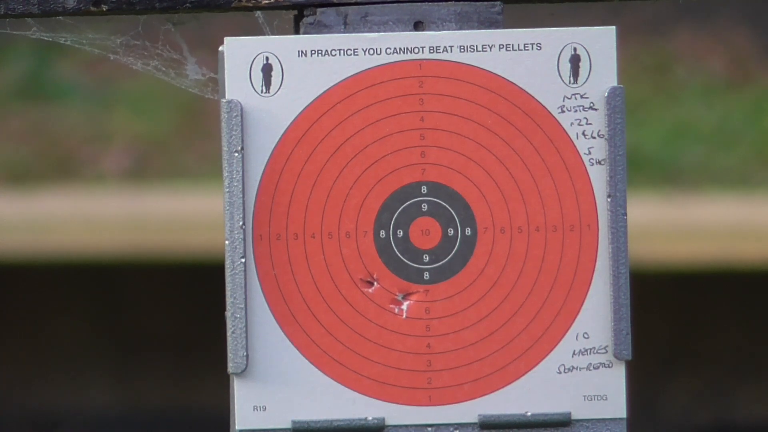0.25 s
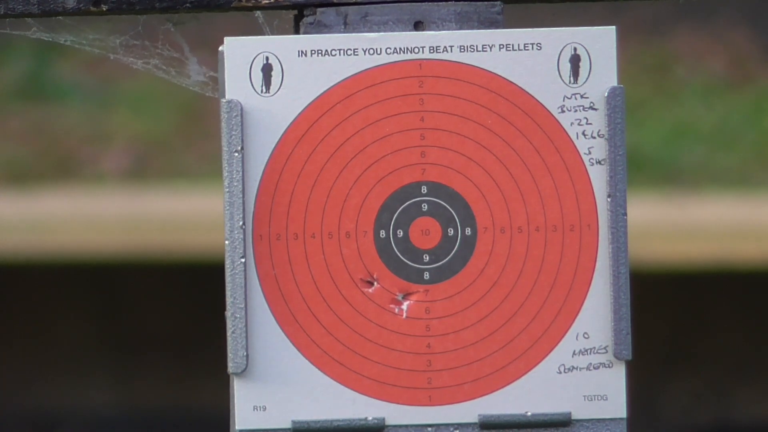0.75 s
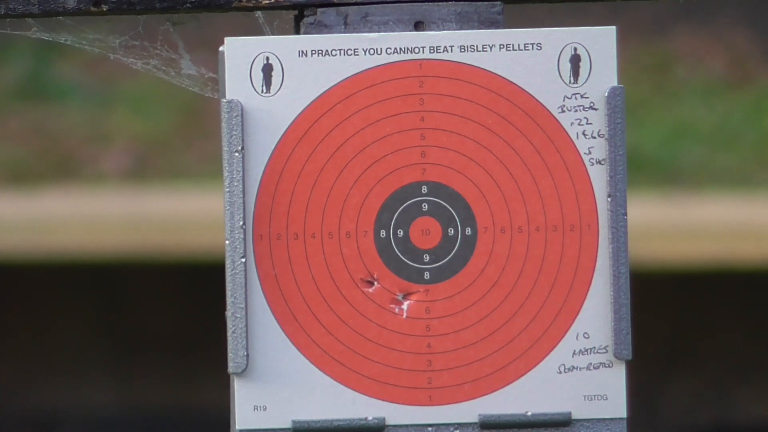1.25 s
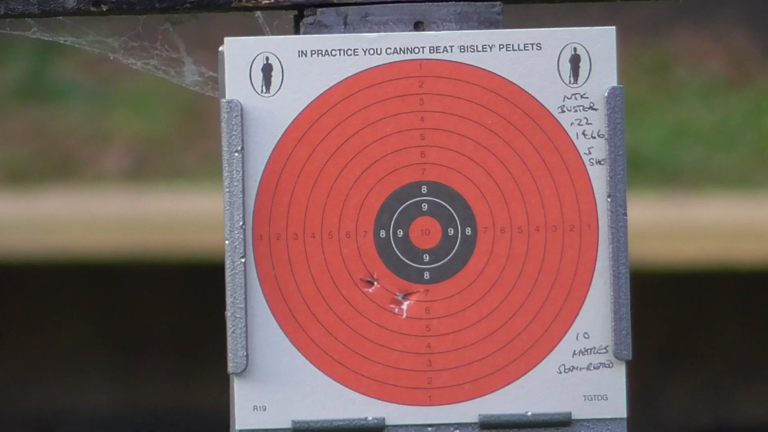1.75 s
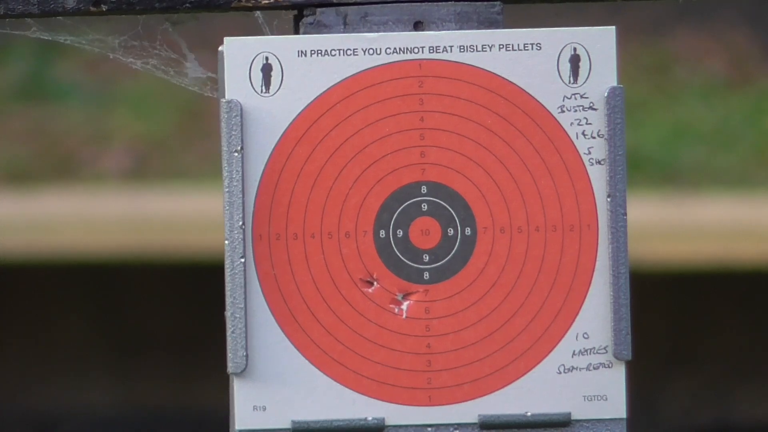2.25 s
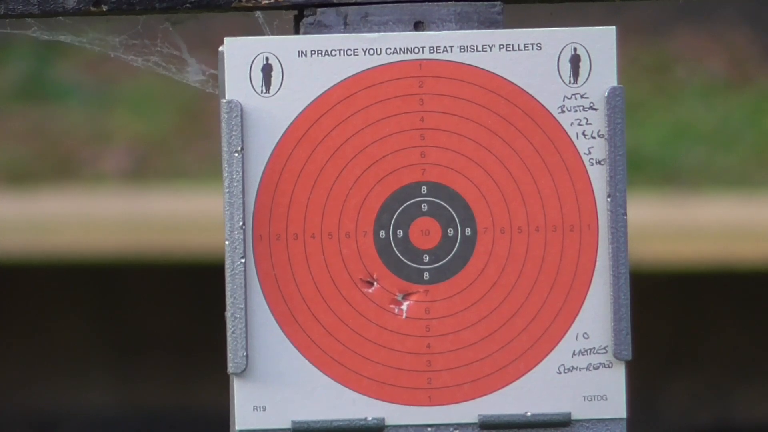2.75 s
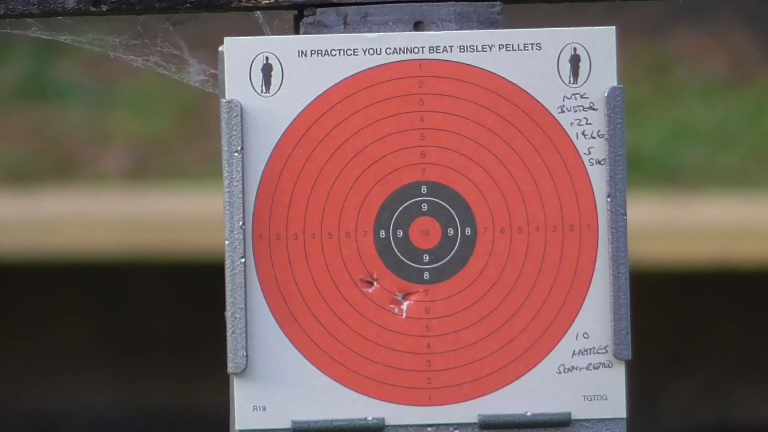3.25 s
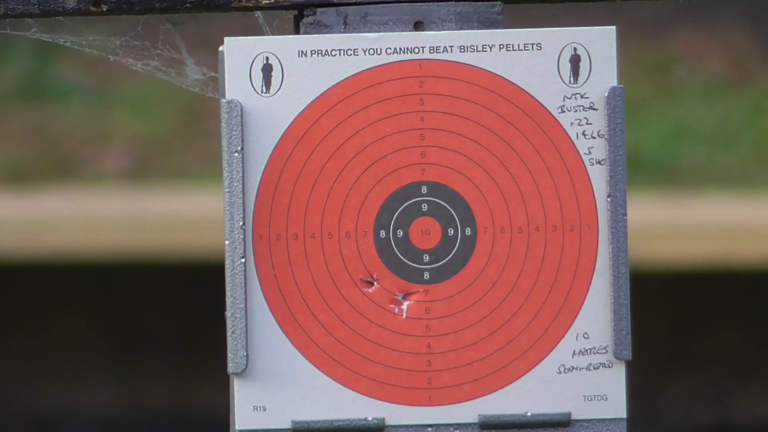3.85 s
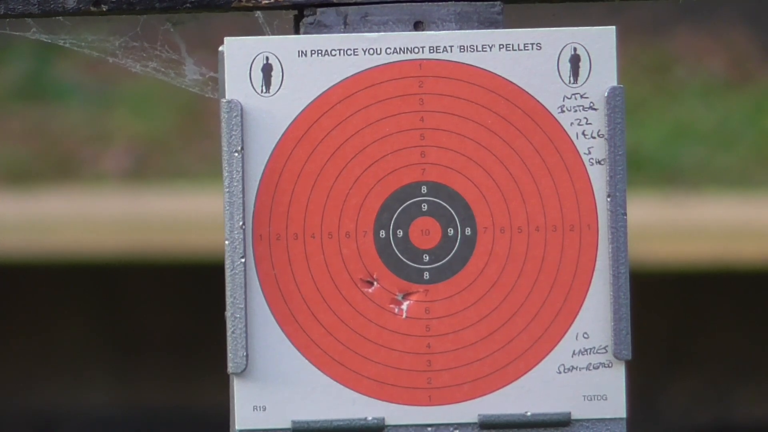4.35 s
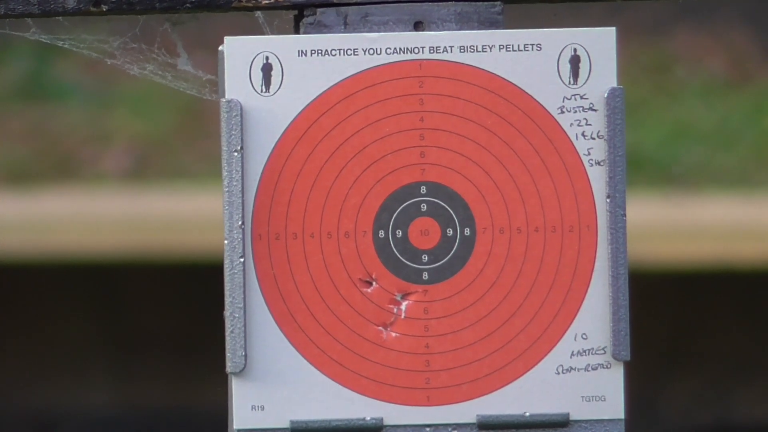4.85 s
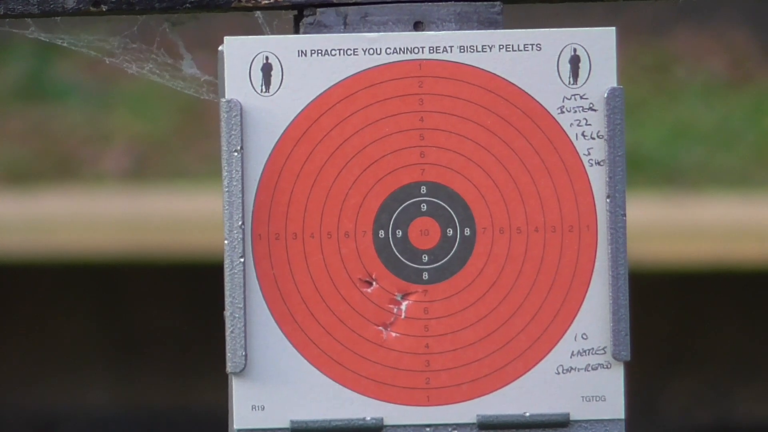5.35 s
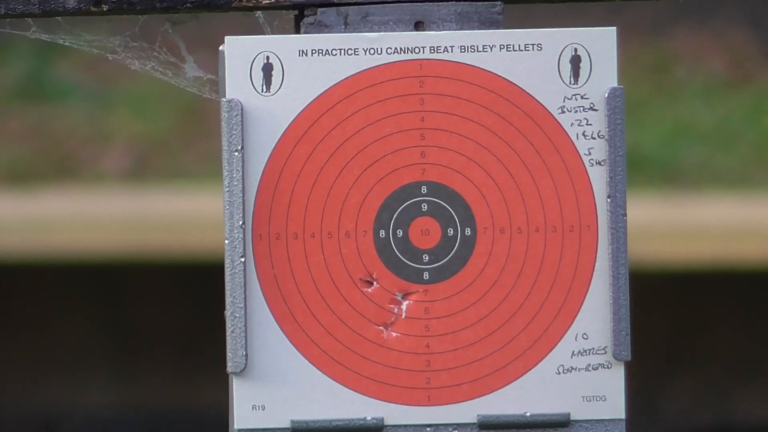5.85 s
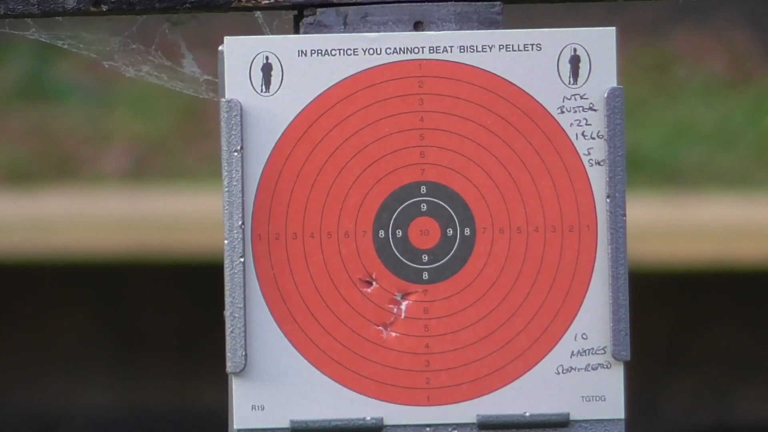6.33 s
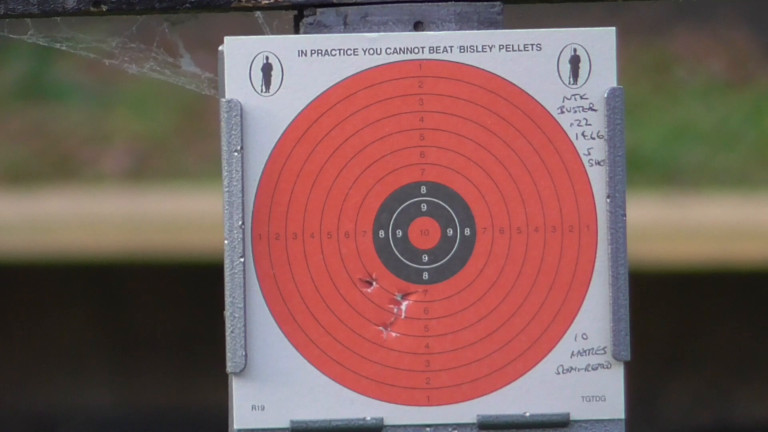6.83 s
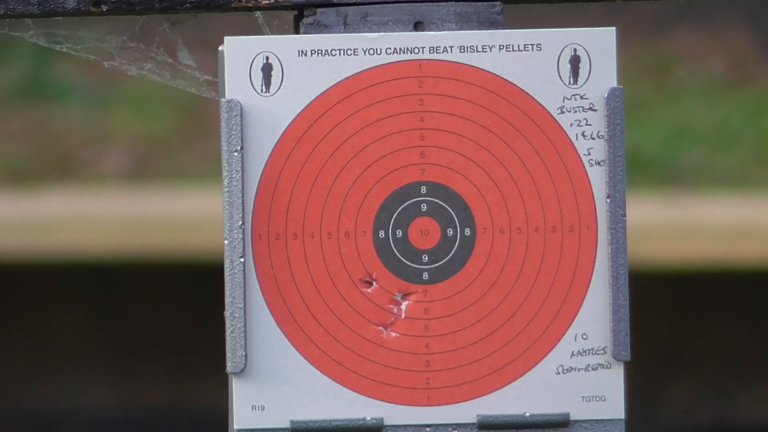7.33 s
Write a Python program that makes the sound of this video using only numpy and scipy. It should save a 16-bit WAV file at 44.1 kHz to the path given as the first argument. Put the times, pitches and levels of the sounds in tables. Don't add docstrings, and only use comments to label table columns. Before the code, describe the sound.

In a garden, sparrows chirp in quick bursts over soft distant traffic, with thin high whistles. After about four and a half seconds an air pistol cracks close by, followed almost at once by the pellet hitting a steel trap, rattling and echoing off fences. Background dips, then birds return. The barrel breaks open with clicks, latches shut sharply, and something is set down. Small microphone, thin bass, clipped peaks.

```python
import sys
import numpy as np
from scipy import signal
from scipy.fft import rfft, irfft
from scipy.io import wavfile
from scipy.ndimage import uniform_filter1d

SR = 44100
rng = np.random.default_rng(int(sys.argv[2]) if len(sys.argv) > 2 else 0)


def invert_db(x):
    u = np.asarray(x, float) / 20
    return 10 ** u


def dump(signal):
    limited = np.clip(np.atleast_2d(signal).T, -1, 1)
    pcm = np.round(limited * 32767).astype(np.int16)
    wavfile.write(sys.argv[1], SR, pcm)


N = 334712
TIME = np.arange(N) / SR


def band(x, hz, width):
    return signal.lfilter(*signal.iirpeak(min(hz, 0.45 * SR), hz / width, fs=SR), x)


def shape(points, hz):
    f, db = np.transpose(points)
    return invert_db(np.interp(np.log(hz + 1), np.log(f), db))


def bumps(peaks, hz):
    return invert_db(sum(db / (1 + (2 * (hz - f) / width) ** 2) for f, width, db in peaks))


def walk(rate, count=N):
    k = int(SR / rate)
    held = np.repeat(rng.standard_normal(count // k + 1), k)
    return uniform_filter1d(uniform_filter1d(held, k), k)[:count]


def add(out, s, x):
    i = int(s * SR)
    out[i:i + len(x)] += x[:N - i]


# frequency_hz, level_db per Hz
ROAD_SPECTRUM = [(25, 4.5), (130, -6.5), (300, -12), (950, -1.5), (1520, -9.5), (1700, -19), (4200, -18),
                 (16000, -33)]
# frequency_hz, width_hz, level_db
HOUSING = [(2190, 170, 6), (2900, 780, -4), (6100, 3200, -15), (7000, 4800, 6.5), (8710, 400, -0.5),
           (289, 67, 7.5)]


def traffic():
    hz, swell, out = np.fft.rfftfreq(N, 1 / SR), walk(1.5), 0
    noise = rfft(rng.standard_normal(N)) * shape(ROAD_SPECTRUM, hz) * bumps(HOUSING, hz)
    octave = np.log2(hz + 1)
    for centre in range(4, 16):
        part = irfft(noise * np.clip(1 - abs(octave - centre), 0, 1), N)
        unsteady = 1 if centre < 12 else 0.4
        out = out + part * invert_db((0.9 * swell + 1.3 * walk(6)) * unsteady)
    return invert_db(-53) * out / out.std()


def glides(table, flutter, peak, ends_db):
    out = np.zeros(N)
    for s, length, first, last, db in table:
        t = TIME[:int(length * SR)]
        edge = np.minimum(np.minimum(t, length - t) / 0.0021, 1)
        glide = last + (first - last) * (1 - t / length) ** 2.7
        pitch = glide * (1 + flutter * walk(170, len(t)))
        swell_db = np.interp(t / length, [0, peak, 1], [ends_db, 0, ends_db])
        strength = np.sqrt(2) * edge * invert_db(db + swell_db + 2.4 * walk(40, len(t)))
        add(out, s, strength * np.sin(2 * np.pi * np.cumsum(pitch) / SR))
    return out


# start_s, length_s, start_hz, end_hz, level_db
ALARMS = [
    (0, 0.029, 8300, 8350, -67),
    (1.33, 0.33, 7970, 8380, -58.5),
    (2.28, 0.26, 7800, 8160, -68.5),
    (4.96, 0.18, 8400, 8340, -63),
    (6.99, 0.32, 8346, 8300, -63.5),
]


def alarm_whistles():
    return glides(ALARMS, flutter=0.0029, peak=0.29, ends_db=-11.5)


def sing(pitch, db):
    count = len(pitch)
    shaky = pitch * (1 + 0.012 * walk(300, count))
    rasp = 1 + 0.7 * walk(1200, count)
    strength = np.hanning(count) ** 0.35 * invert_db(db + 3 * walk(200, count))
    return strength * rasp * np.sin(2 * np.pi * np.cumsum(shaky) / SR)


# start_s, length_s, top_hz, level_db
ARCHED = [(0.325, 0.037, 3950, -53), (0.638, 0.026, 4900, -56.5), (0.723, 0.045, 4300, -56),
          (1.076, 0.044, 4350, -57), (1.938, 0.049, 3750, -63), (2.767, 0.044, 4180, -57.5),
          (3.26, 0.043, 4530, -55), (3.611, 0.03, 5120, -59.5), (3.673, 0.031, 4610, -59.5),
          (6.367, 0.026, 4950, -63)]
# start_s, length_s, start_hz, end_hz, level_db
FALLING = [(.103, 0.063, 5650, 3240, -56), (.304, 0.041, 4700, 3400, -65), (.665, 0.045, 3900, 3000, -64.5),
           (1.215, 0.043, 5500, 4070, -65), (1.27, 0.05, 3800, 3030, -73), (1.543, .014, 4900, 3870, -57),
           (1.59, 0.02, 4270, 3600, -55), (1.908, .022, 4000, 3070, -58), (0, .035, 3340, 2800, -61),
           (2.35, 0.023, 4570, 3930, -70), (3.022, 0.037, 4900, 4750, -64), (3.048, 0.078, 4600, 3950, -68),
           (3.198, 0.03, 4260, 3210, -55), (3.643, 0.013, 4400, 4020, -50), (3.69, 0.022, 4070, 3360, -57),
           (2.815, 0.041, 3430, 2570, -61), (4.515, 0.044, 4300, 4160, -51),
           (4.548, 0.015, 4200, 3280, -57), (4.322, 0.031, 3760, 3480, -65.5),
           (5.905, 0.019, 4710, 4470, -57), (5.966, 0.034, 3700, 3380, -61.5),
           (6.11, 0.018, 5100, 4500, -64), (6.128, .028, 4400, 4290, -62), (6.148, .022, 3950, 3810, -61),
           (6.288, 0.023, 3840, 3780, -62), (6.312, 0.03, 3900, 3655, -54), (6.33, 0.027, 3550, 2970, -57)]
# start_s, length_s, start_hz, end_hz, level_db
RISING = [(.205, 0.085, 3600, 4440, -68), (.255, 0.046, 3900, 4255, -52), (1.882, 0.021, 4210, 4140, -53.5),
          (1.495, 0.047, 4200, 5500, -65), (1.56, 0.02, 3590, 4500, -53.5), (3.175, 0.022, 4300, 4610, -55),
          (4.066, 0.042, 5070, 5900, -67.5), (2.31, 0.017, 4230, 4540, -61),
          (2.33, 0.034, 4960, 5700, -63.5), (2.408, 0.014, 4200, 4600, -51),
          (4.103, .015, 3700, 4770, -53.5), (4.128, 0.036, 3480, 5190, -56),
          (4.145, 0.018, 5370, 6100, -62.5), (4.197, 0.026, 3220, 4620, -58),
          (4.48, 0.046, 4000, 4190, -60), (4.593, 0.034, 3250, 4580, -51), (5.872, 0.027, 3500, 5120, -59),
          (5.93, 0.018, 3280, 3470, -57), (5.945, .024, 3450, 4580, -55.5), (6.555, .053, 4150, 4450, -64),
          (6.61, 0.022, 3640, 3780, -55.5)]
# start_s, length_s, start_hz, end_hz, level_db
DISTANT = [(.95, .05, 4300, 3300, -69), (1.925, .028, 4900, 6600, -68), (2.165, .035, 3840, 4600, -67),
           (2.292, .025, 4200, 6200, -67), (2.385, .022, 3200, 4150, -66), (2.43, .045, 5200, 5800, -67),
           (2.47, .04, 4520, 4480, -65), (2.576, .03, 4550, 4350, -66), (3.0, .03, 6200, 4900, -67),
           (3.128, .022, 4000, 4950, -67), (3.495, .04, 3400, 4440, -68), (3.19, .025, 4900, 4880, -64),
           (3.35, .06, 3000, 2400, -70), (4.565, .03, 4600, 6100, -66), (4.39, .015, 3300, 3200, -66),
           (4.46, .015, 3600, 3500, -67), (5.365, .02, 3550, 3800, -62), (5.895, .04, 5550, 5350, -66),
           (5.845, .02, 4500, 4450, -67), (6.41, .015, 4200, 3900, -66), (6.44, .025, 3800, 4300, -67)]
# start_s, length_s, start_hz, end_hz, swing_hz, level_db
WARBLING = [
    (1.1, .1, 3886, 3215, 244, -54.5),
    (7.34, 0.16, 4380, 3475, 304, -54.5),
]


def sparrows():
    out = np.zeros(N)
    strokes = [(s, length, 0.8 * top, top, 0.74 * top, db) for s, length, top, db in ARCHED]
    for table, halfway in [(FALLING, 0.67), (RISING, 0.84), (DISTANT, 0.6)]:
        for s, length, first, last, db in table:
            strokes.append((s, length, first, first + halfway * (last - first), last, db))
    for s, length, first, turn, last, db in strokes:
        u = np.arange(0, 1, 1 / (length * SR))
        add(out, s, sing(np.interp(u, [0, 0.5, 1], [first, turn, last]), db))
    warble_hz = 28
    for s, length, first, last, swing, db in WARBLING:
        t = TIME[:int(length * SR)]
        sinking = first + (last - first) * t / length
        add(out, s, sing(sinking + swing * np.cos(2 * np.pi * warble_hz * t), db))
    return 0.7 * out + 0.8 * band(out, 3400, 3000)


# start_s, length_s, start_hz, end_hz,
# level_db
THRUSH = [(2.615, .045, 2630, 2700, -63), (2.905, .095, 2750, 3760, -67), (3.885, .065, 2560, 2900, -65),
          (4.04, .07, 2720, 2910, -64.5), (4.1, .06, 2920, 2770, -64.5), (4.18, .045, 2730, 2930, -63),
          (4.21, .065, 2600, 2350, -66), (4.41, .06, 2610, 2900, -62), (5.24, .04, 2600, 2800, -63),
          (.89, .06, 1520, 1610, -57), (4.245, .045, 1560, 1610, -59), (1.755, .04, 4400, 4960, -68),
          (4.396, .025, 4270, 5170, -66)]


def thrush():
    return glides(THRUSH, flutter=0.0072, peak=0.24, ends_db=-14.5)


def birds():
    song = sparrows() + thrush()
    out = invert_db(-1.5) * song
    t, size = TIME[:SR // 3], SR // 16
    fade = (np.exp(-t / 0.016) + 0.42 * np.exp(-t / 0.1)) / np.sqrt(0.014 * SR)
    for i in range(0, N, size):
        piece = song[i:i + 2 * size]
        piece = piece * np.hanning(2 * size)[:len(piece)]
        scatter = fade * rng.standard_normal(len(t))
        add(out, i / SR, invert_db(-2) * signal.fftconvolve(piece, scatter))
    return out


# start_s, length_s, start_hz, end_hz, level_db
ENGINE = [
    (.95, 1, 123, 126, -64),
    (4.33, 0.72, 117.8, 119.6, -54),
    (4.8, 0.47, 120.8, 128, -62),
]


def far_engine():
    return glides(ENGINE, flutter=0.019, peak=0.21, ends_db=-10.5)


def contact(count, db, hz, width, t60, noisy):
    t, noisy = TIME[:count], np.clip(noisy, 0, 1)
    rattle = band(band(rng.standard_normal(count), hz, 1.1 * width), hz, 1.1 * width)
    body = (1 - noisy) * np.sin(2 * np.pi * hz * t) + noisy * 1.645 * rattle / rattle.std()
    return invert_db(db - 60 * t / t60) * np.minimum(t / 0.00015, 1) * body


def blows(table, part):
    out = np.zeros(N)
    for s, db, hard_db, longer in table:
        for hz, width, t60, noisy, mode_db in part:
            tilt_db = hard_db * max(np.log2(hz / part[0][0]), 0)
            add(out, s, contact(SR // 8, db + mode_db + tilt_db, hz, width, t60 * longer, noisy))
    return out


# start_s, peak_db, centre_hz, t60_s
DRY_TICKS = [(4.761, -36, 2970, 0.24), (4.762, -31, 3900, 0.012), (4.813, -22, 4470, .014),
             (4.799, -19.5, 3000, 0.009), (4.6482, -33, 10200, .012), (4.863, -31.5, 5740, 0.028),
             (4.6286, -25, 6960, .008), (4.683, -38, 10300, .012), (4.6895, -38, 11000, 0.011),
             (6.297, -50, 3960, 0.036), (6.307, -38, 3910, 0.043), (5.835, -51.5, 6970, .02),
             (6.646, -43, 7800, 0.051), (6.649, -29, 3620, 0.025), (6.691, -46, 5000, .017),
             (6.716, -19.5, 6500, 0.017), (6.7173, -29, 12000, 0.044), (6.8475, -42, 5970, 0.018),
             (6.857, -37, 6900, .02), (6.9103, -44, 8350, 0.012), (6.92, -35, 6300, .01),
             (6.9415, -34, 7000, .011), (6.949, -41, 9000, .012), (7.101, -56, 7350, .016),
             (7.115, -50, 7500, .015), (7.581, -54, 2500, 0.018)]


def ticks():
    out = np.zeros(N)
    for s, db, hz, t60 in DRY_TICKS:
        add(out, s, contact(SR // 10, db, hz, 3900, t60, 0.56))
    return out


# start_s, peak_db, hardness_db per octave, length_factor
GAS_PUFFS = [
    (4.6294, -1, 0, 0.56),
    (4.6304, 0, -4.5, 1.17),
    (4.6343, -2.5, 1.5, 0.93),
    (4.6392, -26.5, 2, 1.9),
    (4.6424, -13.5, 1, 0.7),
    (4.6484, -36, 5.5, 1.2),
]
# ring_hz, width_hz, t60_s, noisy_share, level_db
MUZZLE_AIR = [(4300, 2400, 0.0042, 1, -0.5), (11700, 2600, 0.0049, 0.55, 0)]


def muzzle_blast():
    return blows(GAS_PUFFS, MUZZLE_AIR)


# start_s, peak_db, hardness_db per octave, length_factor
KICKS = [
    (4.6302, 1.5, 0.5, 0.81),
    (4.6389, -16, -2, 0.88),
]
# ring_hz, width_hz, t60_s, noisy_share, level_db
STOCK_MODES = [(808, 210, 0.018, 0.086, 1), (1460, 1700, 0.018, 0.95, -9), (255, 160, 0.062, 0.39, -27.5),
               (614, 130, .02, 0.23, -24), (6760, 11000, .036, 1, -19)]


def recoil():
    return blows(KICKS, STOCK_MODES)


def returns(table, colour):
    out, hz, t = np.zeros(N), np.fft.rfftfreq(SR // 2, 1 / SR), TIME[:SR // 2]
    treble = 1 / (1 + (3600 / (hz + 1)) ** 4)
    air_db_per_s = 29
    for s, db, rise, t60, treble_db in table:
        noise = rfft(rng.standard_normal(len(t)) * invert_db(2.2 * walk(170, len(t)))) * colour(hz)
        low, high = irfft(noise * (1 - treble)), irfft(noise * treble)
        late = np.maximum(t - rise, 0)
        mix = low / low.std() + invert_db(treble_db - air_db_per_s * late) * high / high.std()
        add(out, s, np.minimum(t / rise, 1) ** 2.1 * invert_db(db - 60 * late / t60) * mix)
    return out


# start_s, peak_db, rise_s, t60_s, treble_db
BLAST_REFLECTIONS = [
    (4.638, -33.5, 0.0056, 0.1, -2.5),
    (4.64, -30.5, 0.031, 0.24, -5.5),
    (4.7, -39.5, 0.062, 0.27, -2.5),
]
# frequency_hz, level_db per Hz
BLAST_COLOUR = [(120, -43.5), (303, -8), (451, -17), (1130, -2.5), (1780, -19.5), (3870, -12), (10500, -16),
                (15000, -31)]


def blast_echo():
    return returns(BLAST_REFLECTIONS, lambda hz: shape(BLAST_COLOUR, hz))


# start_s, dip_db, recovery_s
GAIN_DIPS = [
    (4.645, 15.5, 0.15),
    (4.80, 39, 0.069),
    (6.725, -0.5, .05),
    (6.94, 4, 0.084),
]


def gain_control(background):
    dip_db = sum(db * (TIME > s) * np.exp(-np.maximum(TIME - s, 0) / back) for s, db, back in GAIN_DIPS)
    return background * invert_db(-uniform_filter1d(dip_db, size=300))


# start_s, peak_db, hardness_db per octave, length_factor
PELLET = [
    (4.7888, -5.5, 0.0066, 1),
    (4.8015, -22.5, 0.85, 1),
]
# ring_hz, width_hz, t60_s, noisy_share, level_db
STEEL_MODES = [(1577, 240, 0.036, 0.21, -1.5), (1214, 240, 0.1, 0.28, -12.5),
               (1488, 700, 0.033, 0.11, -3.5), (3440, 210, 0.055, 0.41, -9.5),
               (3620, 370, 0.049, 0.4, -16.5), (5270, 170, .03, .4, -26), (6250, 690, .03, 0.77, -11),
               (7100, 200, .04, .2, -11.5), (11110, 220, 0.018, 0.083, -2), (12400, 400, .02, .3, -32),
               (4500, 3300, 0.011, .8, -3), (4960, 6200, 0.17, 1, -25), (2083, 160, 0.062, 0.22, -13.5)]
# start_s, peak_db, hardness_db per octave, length_factor
LEAD_BOUNCES = [(4.8642, -31, 2.5, 0.49), (4.879, -38, 0, 1), (4.892, -30, -12, 1.1), (4.905, -31, -1, 1.3),
                (4.924, -29, -4, .9), (4.942, -38, -2, .9), (4.962, -32, -4, 0.99), (4.98, -37, -1.5, .9),
                (5.017, -40, -1, 0.91), (5.0817, -35, -8, 0.6), (5.1555, -39, -9, 0.67),
                (5.195, -47.5, -2.5, 0.47), (5.2184, -51, -4, 0.65)]
# ring_hz, width_hz, t60_s, noisy_share, level_db
PLATE_MODES = [(1214, 130, 0.093, 0.63, -0.5), (1590, 230, 0.048, 0.7, -12), (2010, 84, 0.076, 0.77, -6.5),
               (3720, 810, 0.072, 0.56, -10), (5100, 280, .08, 0.57, -6.5), (6340, 620, 0.045, 0.54, -9)]


def steel_trap():
    struck = blows(PELLET, STEEL_MODES) + blows(LEAD_BOUNCES, PLATE_MODES)
    return signal.sosfilt(signal.butter(3, 840, "high", fs=SR, output="sos"), struck)


# start_s, peak_db, rise_s, t60_s, treble_db
TRAP_REFLECTIONS = [
    (4.795, -21, 0.0038, 0.17, -12.5),
    (4.81, -27.5, 0.066, 0.44, -6.5),
    (4.9, -38.5, 0.059, 0.34, -13),
    (5.012, -51, 0.0051, 0.076, -8),
    (5.04, -48, 0.013, 1, -15),
    (5.078, -54, 0.0083, 0.068, -21),
]
# frequency_hz, level_db per Hz
TRAP_COLOUR = [(240, -101), (400, -36.5), (1100, -1), (2060, -9.5), (5200, -10.5), (8000, -18),
               (11400, -28), (15000, -59)]
# frequency_hz, width_hz, level_db
TRAP_PEAKS = [(1226, 77, 13), (1600, 220, 11), (2030, 180, 13), (2660, 100, 6.5), (3515, 300, 14),
              (4400, 300, 8), (5190, 230, 11.5), (6100, 160, -0.5), (11300, 340, 17)]


def trap_echo():
    return returns(TRAP_REFLECTIONS, lambda hz: shape(TRAP_COLOUR, hz) * bumps(TRAP_PEAKS, hz))


# start_s, peak_db, rise_s, t60_s, treble_db
RELOAD_REFLECTIONS = [(6.47, -48, 0.058, 0.48, -7), (6.65, -35, 0.0023, 0.062, -0.5),
                      (6.66, -52.5, 0.018, 0.81, -2), (6.72, -52, 0.0056, 0.42, 9.5),
                      (6.8, -51, 0.082, 0.42, -6.5), (6.932, -34, 0.0025, 0.079, -1.5),
                      (6.95, -47, 0.013, 0.74, 0.5), (6.975, -58, 0.059, .07, -4),
                      (7.04, -53, 0.05, 0.66, -4.5), (7.2, -67.5, 0.13, 0.042, 8.5)]
# frequency_hz, level_db per Hz
RELOAD_COLOUR = [(180, -35.5), (350, -1.5), (1100, 7), (1600, -8), (3600, -12.5), (6000, -22.5),
                 (15000, -39)]
# frequency_hz, width_hz, level_db
LOOSE_PARTS = [(2300, 520, 12), (3600, 400, 3), (7400, 1200, 7), (11600, 1200, 7)]


def reload_echo():
    return returns(RELOAD_REFLECTIONS, lambda hz: shape(RELOAD_COLOUR, hz) * bumps(LOOSE_PARTS, hz))


# start_s, peak_db, hardness_db per octave, length_factor
HINGE_SLIPS = [
    (6.5015, -42, -5.5, 0.93),
    (6.516, -42, -14, 0.75),
    (6.5205, -42, -5, .5),
    (6.527, -39, -3, 0.48),
    (6.5302, -33, -15, .7),
    (6.534, -35, -0.5, .7),
]
# start_s, peak_db, hardness_db per octave, length_factor
BARREL_BREAKS = [
    (6.5366, -28.5, -0.5, 1.3),
    (6.6425, -29.5, 4.5, 1.03),
    (6.711, -32, -2, 2.2),
    (6.7155, -17.5, 4, 0.33),
    (6.719, -35, 7, 1.24),
]
# ring_hz, width_hz, t60_s, noisy_share, level_db
BARREL_MODES = [(1120, 900, 0.024, 0.67, 0), (3405, 3900, 0.028, 0.45, 0)]


def breaking_open():
    return blows(HINGE_SLIPS, BARREL_MODES) + blows(BARREL_BREAKS, BARREL_MODES)


# start_s, ring_hz, level_db, t60_s, swell_s
LONG_MODES = [
    (6.717, 1281, -37, .33, .005),
    (6.717, 4904, -50, .25, .005),
    (6.745, 7009, -47, .35, .035),
    (6.717, 8064, -50, .25, .005),
    (6.72, 9700, -63, .6, .03),
]


def rings():
    out, stop_s = np.zeros(N), 6.87
    for s, hz, db, t60, swell in LONG_MODES:
        t = TIME[:int((stop_s - s) * SR)]
        held = np.minimum(np.minimum(t / swell, (t[-1] - t) / 0.027), 1)
        add(out, s, held * invert_db(db - 60 * t / t60) * np.sin(2 * np.pi * hz * t))
    return out


# start_s, peak_db, hardness_db per octave, length_factor
LATCH_BLOWS = [
    (6.9281, -3.5, 0, 1.03),
    (6.9312, -16, -3, 0.66),
    (6.9327, -11, -10.5, 0.49),
]
# ring_hz, width_hz, t60_s, noisy_share, level_db
LATCH_MODES = [(2277, 500, 0.011, .05, -0.5), (3850, 1200, 0.007, 0.1, 1.5), (3300, 700, 0.0079, 0.1, -3.5),
               (4900, 1000, 0.009, 0.1, -2.5), (2995, 3000, 0.022, 1, -11.5), (7840, 1000, 0.02, .3, -14),
               (1350, 400, 0.028, 0.059, -14.5), (1760, 560, 0.017, .2, -11.5), (228, 260, 0.028, 0.5, -43),
               (2340, 350, 0.043, 0.32, -12.5), (8900, 1100, .008, 0.26, -21)]


def latching():
    return blows(LATCH_BLOWS, LATCH_MODES)


# start_s, peak_db, hardness_db per octave, length_factor
RATTLES = [(6.9678, -40, 5, 0.64), (6.979, -42, 0, 1), (6.995, -43, -5, 1), (7.005, -44, -3, .8),
           (7.0616, -43, -6, 1), (7.068, -46, -13, 1.1), (7.085, -46, -3, 1), (7.098, -48, 2, 0.77)]
# ring_hz, width_hz, t60_s, noisy_share, level_db
CATCH_MODES = [(2160, 360, .04, 0.64, 1), (3200, 400, 0.037, .5, -9.5), (2500, 180, .03, .5, -8.5),
               (4000, 500, 0.025, .6, -2.5)]


def catch_chatter():
    return blows(RATTLES, CATCH_MODES)


# start_s, peak_db, hardness_db per octave, length_factor
BENCH_KNOCKS = [
    (7.5735, -37.5, 0, 0.3),
    (7.5815, -29, 0, 1),
]
# ring_hz, width_hz, t60_s, noisy_share, level_db
BENCH_MODES = [(430, 300, 0.081, 0.34, 1.5), (1190, 670, 0.028, .5, -9.5)]


def bench_knocks():
    return blows(BENCH_KNOCKS, BENCH_MODES)


def scene():
    background = traffic() + birds() + far_engine()
    shot = ticks() + muzzle_blast() + recoil() + blast_echo()
    hit = steel_trap() + trap_echo()
    reloading = reload_echo() + breaking_open() + rings() + latching() + catch_chatter() + bench_knocks()
    return (alarm_whistles() + shot + hit + reloading + gain_control(background))[None]


def band_limit(x):
    return signal.sosfilt(signal.butter(12, 16600, fs=SR, output="sos"), x)


def record(dry):
    x = np.clip(dry, -0.72, 0.72)
    x = signal.sosfilt(signal.butter(2, 153.3, "high", fs=SR, output="sos"), x)
    x = signal.sosfilt(signal.butter(3, 14790, fs=SR, output="sos"), x)
    x = signal.sosfilt(signal.ellip(10, 0.2, 90, 15800, fs=SR, output="sos"), x)
    return band_limit(x)


dry = scene()
out = record(dry)
dump(out)
```